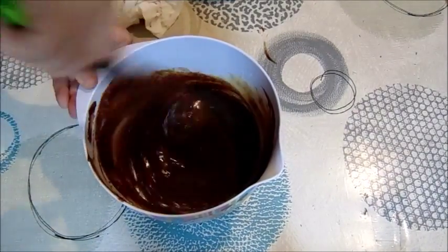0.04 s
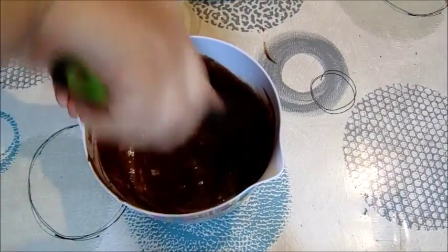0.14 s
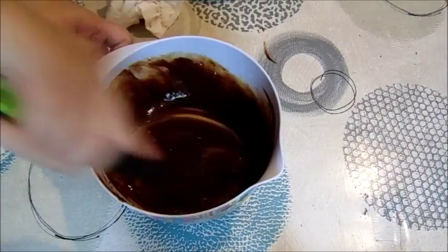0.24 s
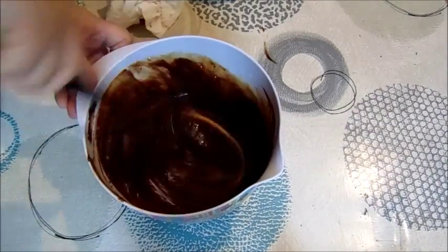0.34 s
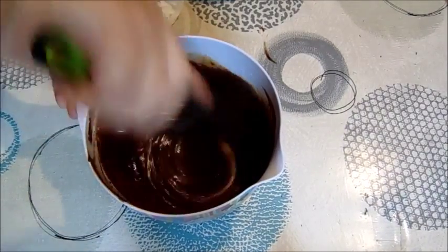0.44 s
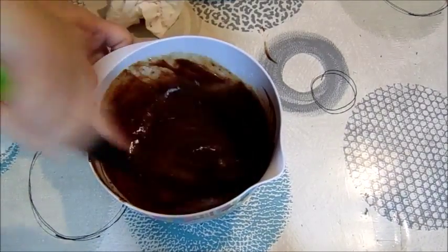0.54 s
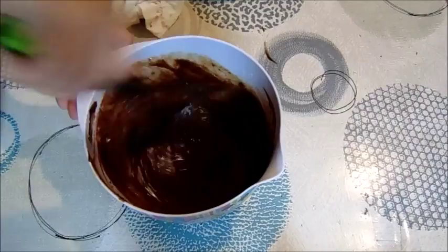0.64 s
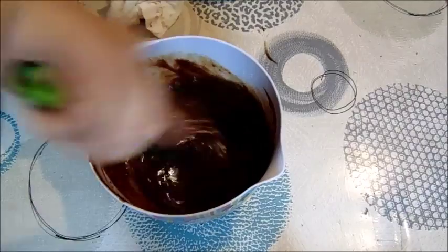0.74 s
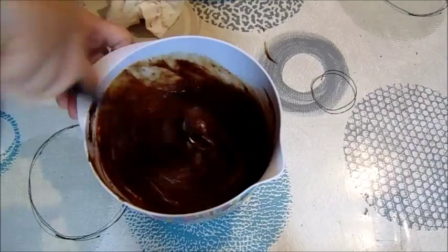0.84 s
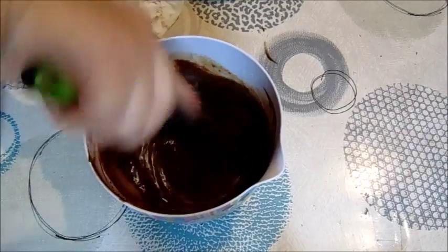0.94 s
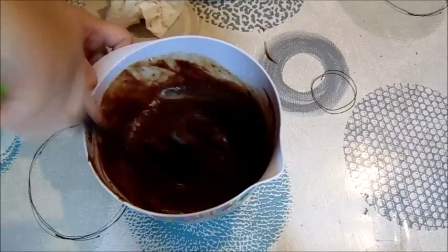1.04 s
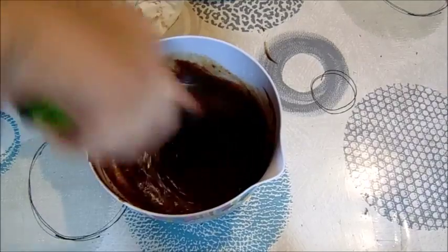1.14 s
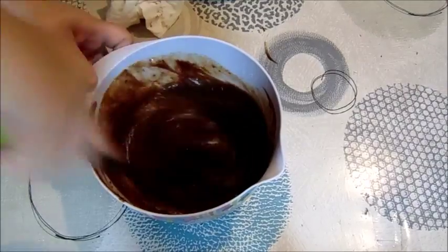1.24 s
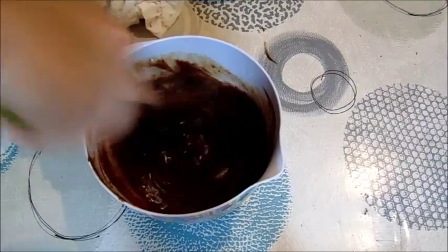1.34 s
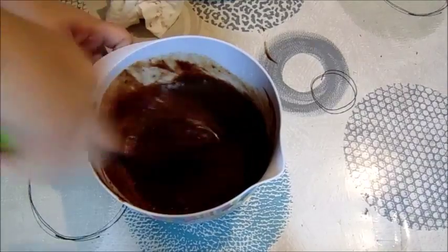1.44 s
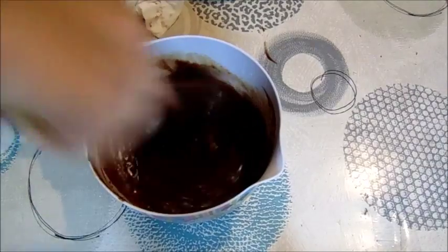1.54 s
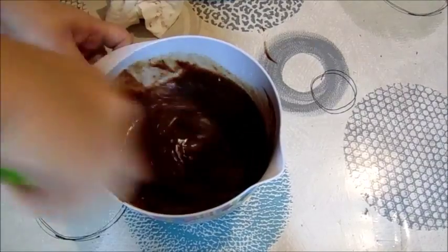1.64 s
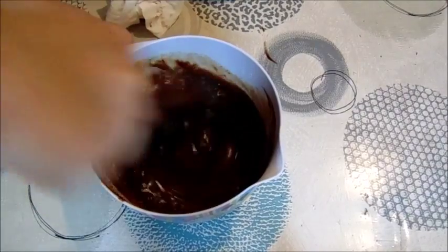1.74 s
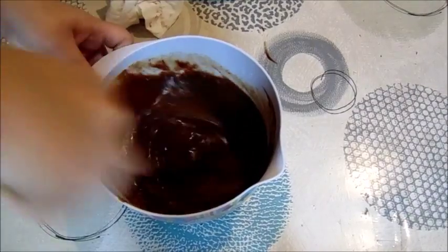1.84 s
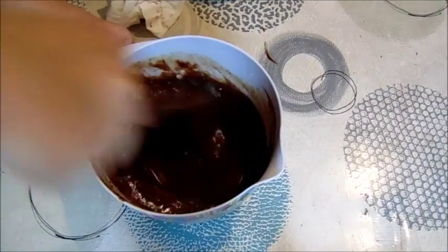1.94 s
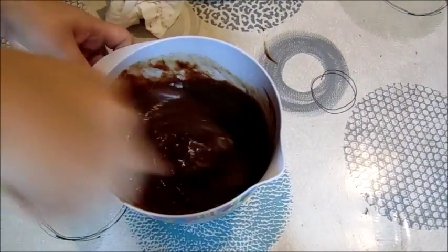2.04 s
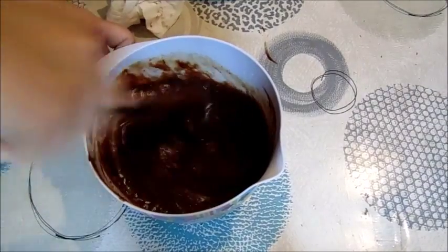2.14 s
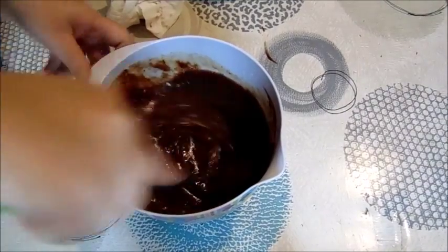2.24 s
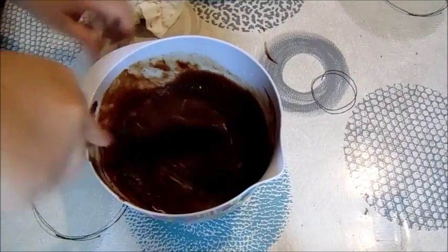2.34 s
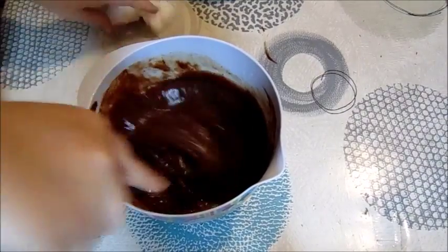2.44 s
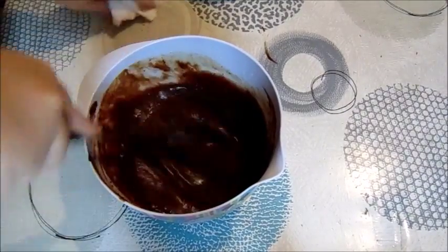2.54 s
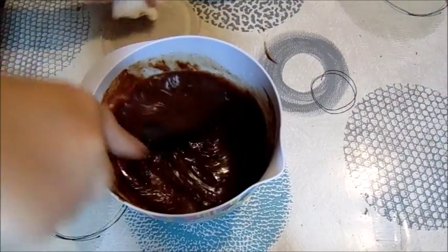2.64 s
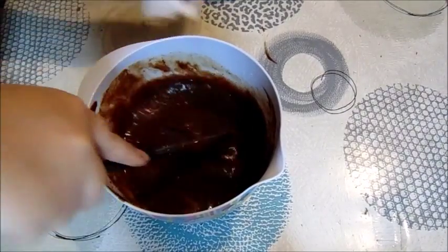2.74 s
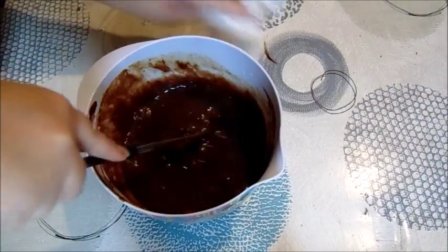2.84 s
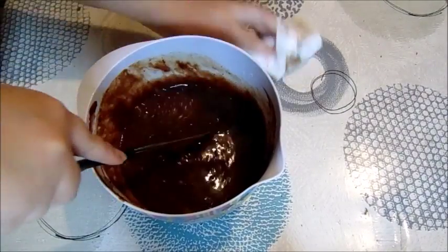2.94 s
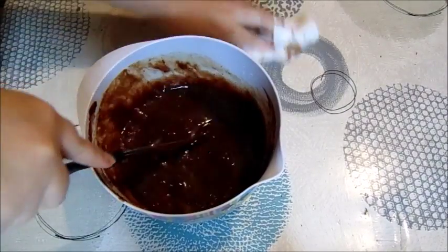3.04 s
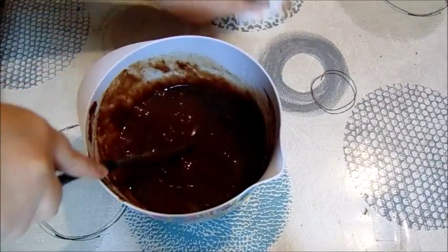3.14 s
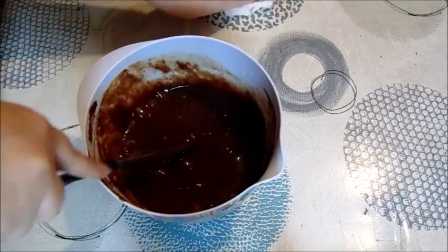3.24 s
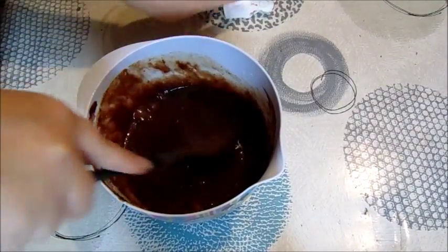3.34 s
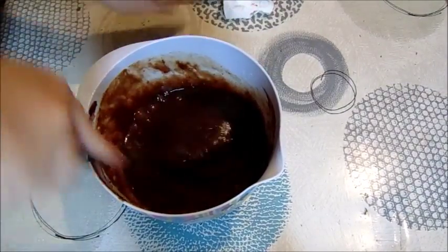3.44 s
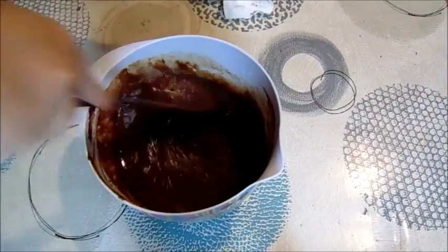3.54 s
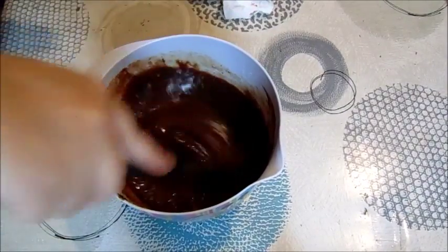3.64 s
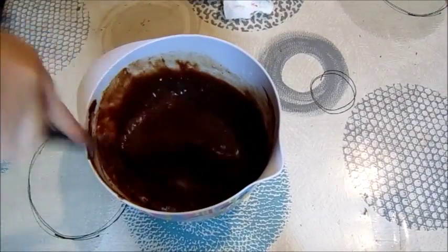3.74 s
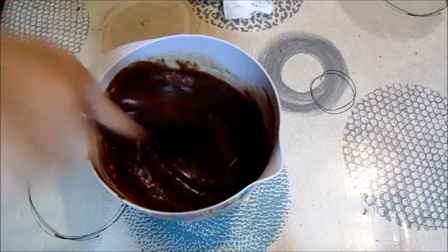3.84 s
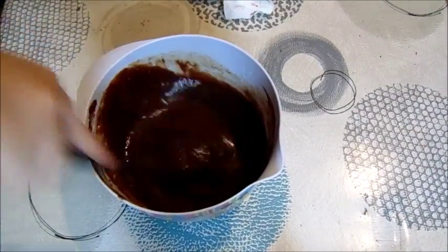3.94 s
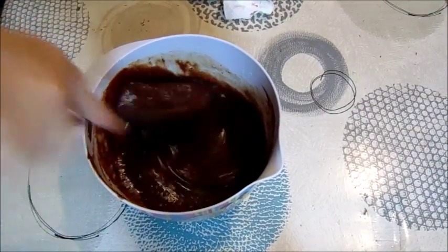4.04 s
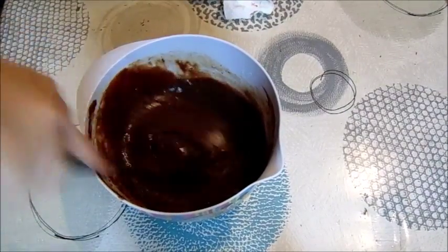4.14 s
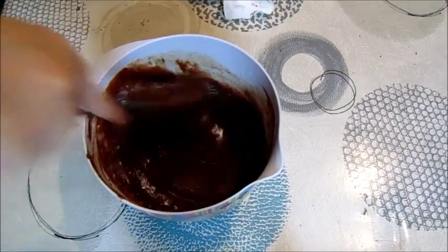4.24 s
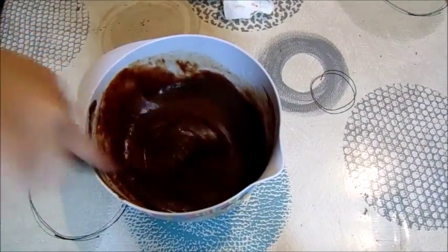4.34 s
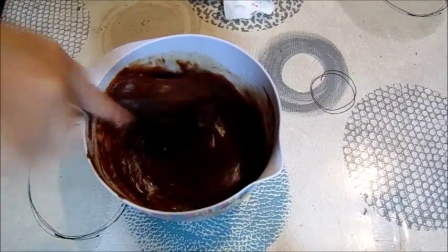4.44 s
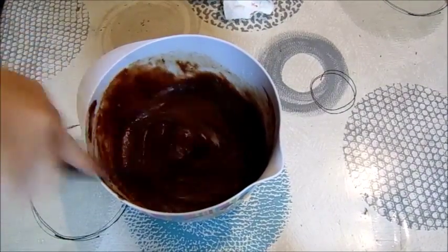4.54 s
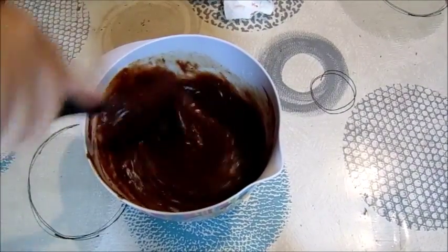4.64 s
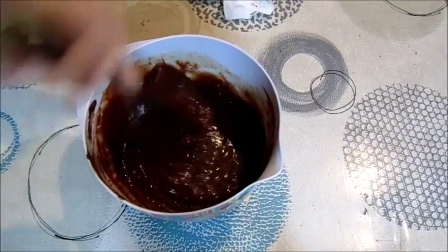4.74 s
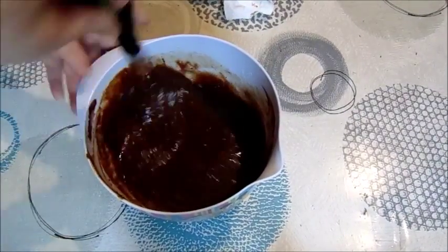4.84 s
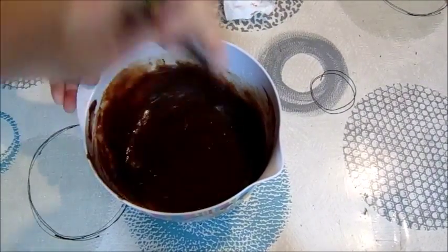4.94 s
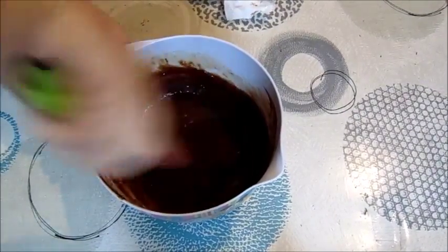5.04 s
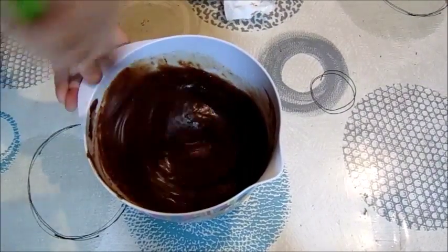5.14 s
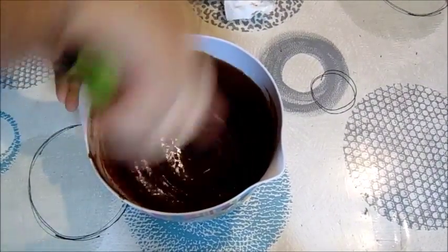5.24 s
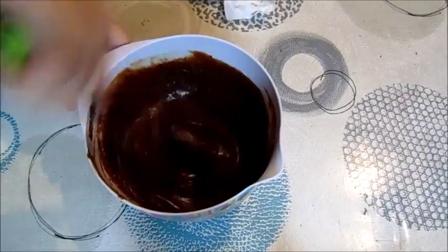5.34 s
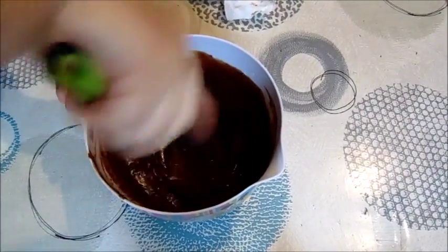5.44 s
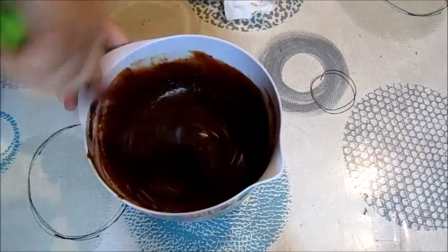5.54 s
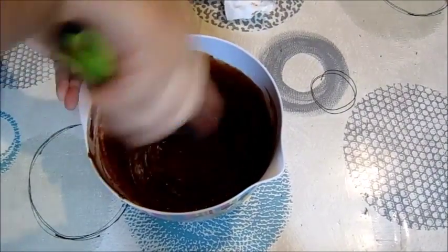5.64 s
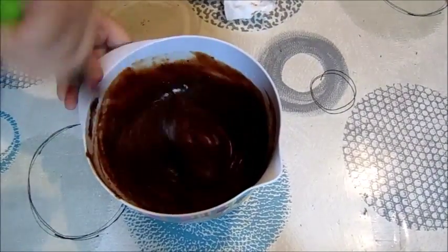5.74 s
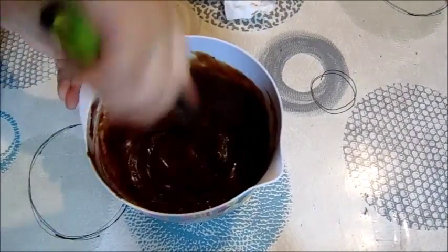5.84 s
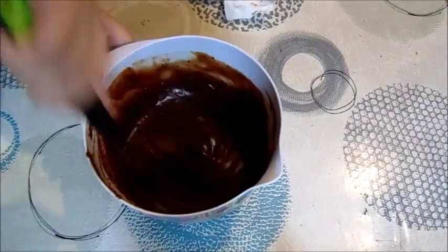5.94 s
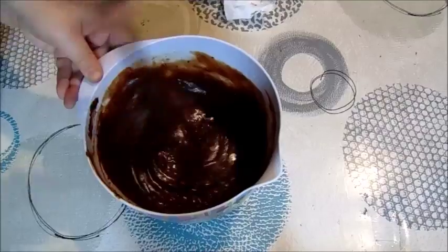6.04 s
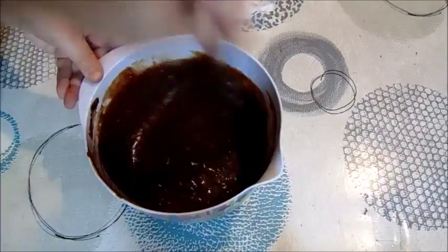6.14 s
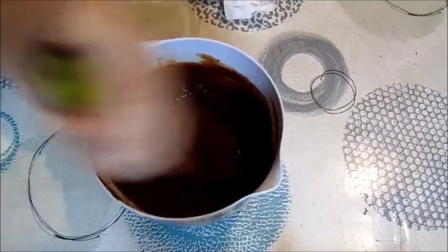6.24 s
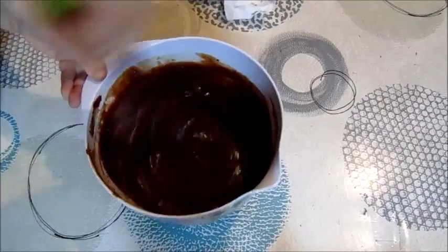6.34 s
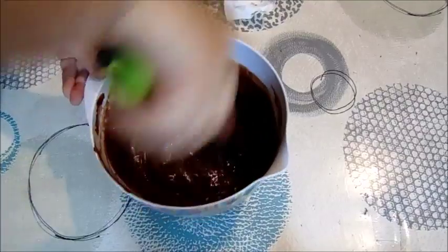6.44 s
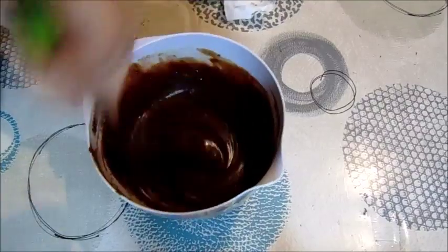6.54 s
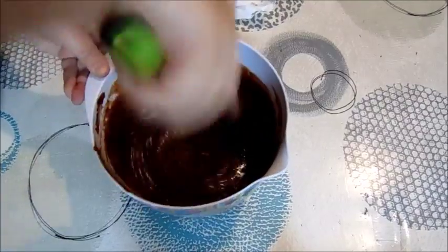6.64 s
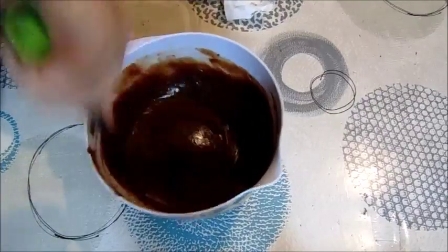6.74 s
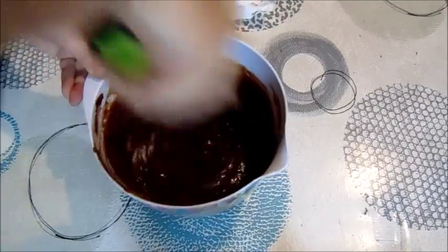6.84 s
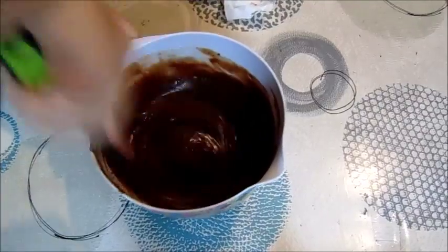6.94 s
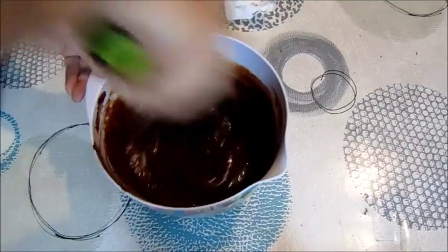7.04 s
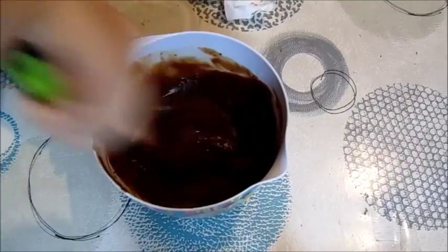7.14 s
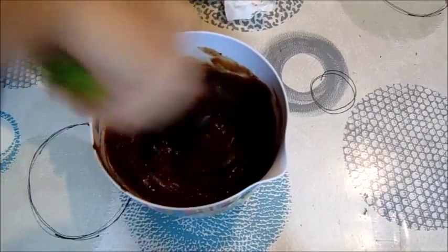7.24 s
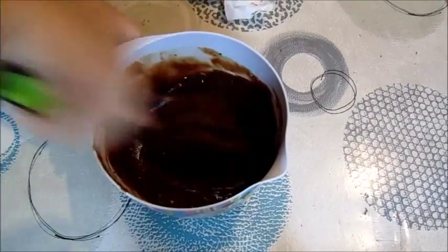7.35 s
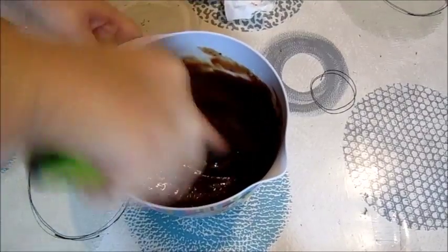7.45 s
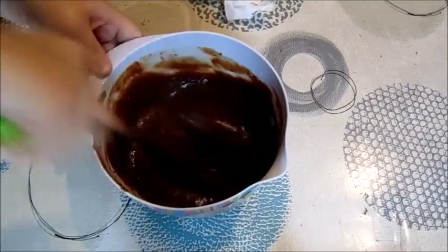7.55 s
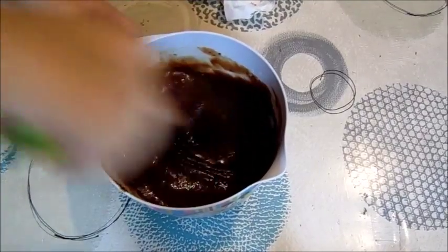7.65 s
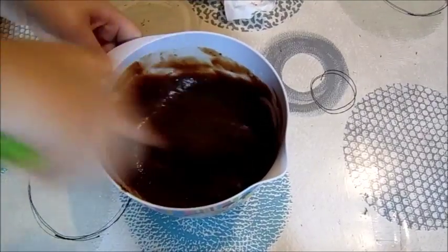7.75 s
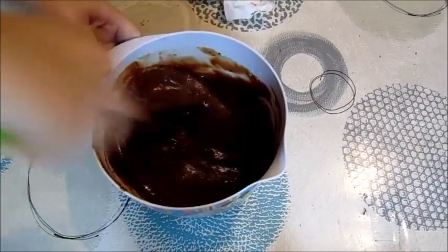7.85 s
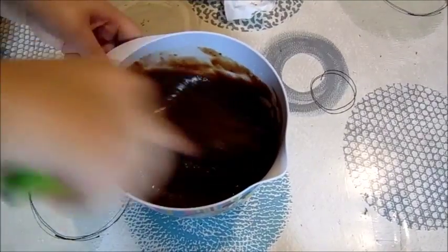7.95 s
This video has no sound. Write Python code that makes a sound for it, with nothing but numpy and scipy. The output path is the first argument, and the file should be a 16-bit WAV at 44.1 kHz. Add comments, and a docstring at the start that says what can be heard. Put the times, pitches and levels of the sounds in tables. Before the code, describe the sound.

Brisk stirring of thick chocolate batter in a plastic bowl: sharp irregular taps, short rasps and soft wet pops, with a quiet mid-way pause.

```python
"""A knife blade clicks and scrapes on the wall of a plastic bowl as it stirs thick chocolate batter, near a phone.
Each click is a burst of contact noise with decaying modes of blade and bowl; scrapes are stick-slip noise.
The batter squelches and pops as damped, rising bubbles; dull thuds, a paper tissue and a faint groan join in.
A small hard-walled kitchen answers with a noise tail, over still air, a faint hum and a thin whine."""
import sys
import numpy as np
from scipy import signal
from scipy.fft import rfft, irfft
from scipy.io import wavfile

SR = 44100
rng = np.random.default_rng(int(sys.argv[2]) if len(sys.argv) > 2 else 0)


def dump_mix(stems):
    """Bounce the given channels to the path in sys.argv[1] as a 16-bit WAV at rate SR."""
    frames = np.atleast_2d(stems).T  # one column per channel
    limited = np.clip(frames, -1, 1)  # hard clip at full scale
    pcm = np.round(limited * 32767).astype(np.int16)
    wavfile.write(sys.argv[1], SR, pcm)


N = 352800
TIME = np.arange(N) / SR

# strikes of the blade on the wall, and a faint tick of paper in the pause (at 3.011 s):
# start_s, level_db (of the tick), depth (0 bare rim, 1 deep in batter)
STRIKES_AND_TICK = [(0.0818, -35.5, 0.69), (0.119, -38, 0.4), (0.1537, -17, 0.24), (0.244, -31, .1),
                    (0.268, -33, 0.15), (0.465, -32, 0.47), (.483, -21, 0.29), (0.7438, -29.5, 0.36),
                    (0.86, -39, 0.69), (.965, -37, 0.5), (1.0938, -40.5, 0.81), (1.162, -39.5, 0.52),
                    (1.337, -37, 0.57), (1.3917, -32, 0.089), (1.552, -37.5, 0.89), (1.587, -33.5, .1),
                    (1.6282, -21, 0.091), (1.8365, -42, 0.68), (1.9316, -41.5, 0.67), (2.0826, -40.5, 0.85),
                    (2.154, -48, 1), (2.432, -44, 0.48), (2.566, -47.5, 0.89), (2.5738, -49, 1),
                    (2.947, -46, .1), (3.011, -55, .1), (3.5322, -43.5, 0.9), (3.618, -49, .35),
                    (3.7166, -44.5, 0.25), (3.7885, -47, 0.87), (3.9214, -39, 0.34), (4.0266, -36, 0.76),
                    (4.1125, -45, 0.91), (4.1345, -39.5, 0.52), (4.231, -38.5, 0.77), (4.2417, -37, 0.95),
                    (4.32, -38.5, 0.66), (4.424, -37, 0.76), (4.441, -38, 0.66), (4.451, -33, 1),
                    (4.507, -35.5, 0.68), (4.6385, -32.5, 0.52), (4.6524, -33, 0.69), (4.8771, -36.5, 0.61),
                    (4.925, -39, 0.57), (5.0732, -37.5, 0.44), (5.2207, -30.5, 0.083), (5.259, -27.5, 0.56),
                    (5.2658, -13.5, 0.33), (5.282, -34, 0.19), (5.451, -39, 0.33), (5.4827, -41, 0.88),
                    (5.5804, -36, 0.78), (5.655, -37.5, 0.26), (5.7058, -39.5, 0.78), (5.783, -40.5, 0.58),
                    (5.8418, -33.5, 0.07), (5.8748, -29, 0.43), (5.983, -39.5, 0.74), (6.009, -30.5, 0.4),
                    (6.106, -33, 0.47), (6.2874, -39, 0.61), (6.458, -26.5, 0.46), (6.465, -21.5, 0.13),
                    (6.4712, -25, 0.44), (6.7145, -36, 0.7), (6.9134, -43.5, 0.7), (6.93, -43, 0.4),
                    (7.1337, -35.5, 0.33), (7.3047, -42, 0.56), (7.3486, -40, 0.86), (7.436, -44.5, 0.64),
                    (7.4611, -40.5, 0.65), (7.4715, -35.5, 0.76), (7.4765, -35, 0.74), (7.585, -24, 0.39),
                    (7.589, -22.5, 0.2), (7.691, -37, 0.83), (7.7, -32.5, 0.31), (7.8114, -24, 0.19),
                    (7.8179, -25.5, 0.15), (7.831, -30, 0.73), (7.918, -29, 0.56)]
# modes of the blade, before the extra damping of contact: pitch_hz, level_db (relative), t60_s
BLADE_MODES = [(2337, -13.5, 0.088), (3112, -0.5, 0.037), (3810, 4, 0.022), (4480, 5.5, 0.03),
               (5420, 4, 0.056), (7230, 7, 0.015), (8680, 5.5, 0.028), (12010, 9, 0.036),
               (12370, 21, 0.0048), (14040, 12, 0.018)]
# modes of the bowl and the air in it: pitch_hz, level_db (relative), t60_s
BOWL_MODES = [(365.6, -0.5, 0.13), (568.3, -4.5, 0.16), (651, 7, 0.025), (726, 2, 0.11), (1270, 5, 0.024),
              (2245, 19.5, 0.006)]
# level against the tick of a strike, at the rim and deep in the batter (dB)
RIM_RING_DB, DEEP_RING_DB, RIM_KNOCK_DB, DEEP_KNOCK_DB = -9, -2, -28, 2
# light touches on the wall at random: rate, level above the drag, greatest depth
TOUCHES_PER_S, TOUCH_DB, TOUCH_DEPTH = 9, 2.5, 0.72


def clicks(contact_s=0.0025, tick_ring=0.4, blade_ring=1.36, bowl_ring=0.7, grit=0.99):
    """Impact excitation: brief chatter sets modes ringing, hollower when deeper; a paper tick shares the model."""
    out, t = np.zeros(N), TIME[:SR // 12]
    contact = (1 - np.exp(-t / 0.00045)) * np.exp(-(t / contact_s) ** 2)
    touches = []
    for s, db, _, u in by_chance(TOUCHES_PER_S, stirring(1)):
        touches.append((s, db + TOUCH_DB, TOUCH_DEPTH * u))
    for s, db, depth in STRIKES_AND_TICK + touches:
        chatter = rng.standard_normal(len(t))
        crack = burst(np.sign(chatter) * np.abs(chatter) ** grit * contact)
        # the further decay is the damping by hand and batter
        blade = burst(ring(BLADE_MODES, t, scatter_db=5.5, detune=0.038) * np.exp(-t / 0.01))
        bowl = burst(ring(BOWL_MODES, t, scatter_db=2.0, detune=0.017))
        tick = burst(band(crack + tick_ring * blade, 5200, 17500))
        body = burst(band(crack + blade_ring * blade, 2370, 4690, order=3))
        low_crack = burst(band(crack, 298, 2530, order=3))
        knock = burst(low_crack + bowl_ring * bowl)
        ring_db = RIM_RING_DB + depth * (DEEP_RING_DB - RIM_RING_DB)
        knock_db = RIM_KNOCK_DB + depth * (DEEP_KNOCK_DB - RIM_KNOCK_DB)
        click = tick + undb(ring_db) * body + undb(knock_db) * knock
        add(out, s, undb(db) * click)
    return out


# single modes of blade or bowl that sing out at some strikes: start_s, pitch_hz, level_db, t60_s
SINGING_MODES = [(0.155, 4550, -31, 0.0068), (0.483, 366, -50.5, .13), (0.745, 4470, -38.5, 0.04),
                 (1.6269, 3970, -27.5, 0.027), (1.6284, 5620, -24, 0.011), (1.628, 2970, -35, 0.029),
                 (4.878, 3360, -41.5, 0.068), (4.926, 3495, -42.5, 0.056), (5.265, 3890, -23, 0.012),
                 (5.268, 580, -38.5, .1), (5.266, 2295, -36, 0.036), (5.876, 374, -50, .15),
                 (5.874, 4140, -33, 0.018), (5.875, 7770, -35, 0.017), (7.8109, 2505, -31, 0.036),
                 (7.811, 3640, -30.5, 0.059)]


def pings():
    """Modal resonance: one lightly damped mode decays exponentially after a strike."""
    out, t = np.zeros(N), TIME[:SR // 4]
    for s, hz, db, t60 in SINGING_MODES:
        add(out, s, undb(db) * burst(ring([(hz, 0, t60)], t, scatter_db=0, detune=0)))
    return out


# spectrum of the friction noise: pitch_hz, level_db (relative)
FRICTION_SPECTRUM = [(650, -24), (1500, -4.5), (2400, -4), (4000, 4.5), (6500, 3.5), (10000, 3.5),
                     (13500, 4)]
# the film of batter under the blade grips and lets go: depth (dB), highest full-strength rate (Hz)
GRIP_DB, GRIP_HZ = 2.8, 28
DRAG_DB = 0


def scraping(slip_s=0.002, blade_ring=0.47):
    """Stick-slip friction: small rasps crackle and drive a pressed, damped blade whose modes shift as it turns."""
    slips_per_s, spread_db, drag, damped_s = 430, 4.8, .17, .0028
    t = TIME[:SR // 40]
    slips = signal.fftconvolve(np.abs(grains(slips_per_s, spread_db)), np.exp(-t / slip_s))[:N]
    rasp = (unit(slips) + drag) * rng.standard_normal(N)
    friction = unit(colour(rasp, FRICTION_SPECTRUM))

    def damped_blade():
        """Modal damping: contact with the wall shortens the blade's ring."""
        return ring(BLADE_MODES, t, scatter_db=6.0, detune=0.055) * np.exp(-t / damped_s)

    rung = moving_ring(friction, damped_blade, count=64)
    grip = undb(GRIP_DB * wander(GRIP_HZ))
    effort = np.hypot(firm_strokes(), undb(DRAG_DB) * stirring(1))
    return unit((friction + blade_ring * rung) * grip) * effort


# firm strokes along the wall: start_s, length_s, level_db (before the pressure envelope)
WALL_STROKES = [(0.066, 0.23, -53), (0.236, 0.11, -45.5), (1.08, 0.21, -50.5), (1.302, 0.16, -50),
                (1.533, 0.09, -41.5), (1.94, 0.14, -49.5), (2.146, 0.11, -47), (2.214, 0.24, -53.5),
                (2.558, 0.2, -51), (3.54, 0.19, -50), (4.02, 0.12, -50.5), (4.238, 0.13, -46),
                (5.037, 0.31, -46), (5.342, 0.11, -41), (5.582, 0.32, -49), (6.278, 0.14, -48),
                (6.781, 0.076, -44.5), (7.137, 0.068, -48), (7.47, 0.05, -45), (7.64, 0.15, -47.5),
                (7.861, 0.099, -41)]


def firm_strokes():
    """Amplitude envelope: the gain follows the pressure of each firm stroke along the wall."""
    out = np.zeros(N)
    for s, length_s, db in WALL_STROKES:
        add(out, s, undb(db) * pressure(length_s))
    return out


def pressure(length_s, rise=0.0074, fall=0.36, sag_db=-3):
    """Contact force: the blade bites, eases off and leaves the wall; rise and fall are shares of the stroke."""
    u = np.linspace(0, 1, int(max(length_s, .02) * SR))
    bite = np.clip(u / rise, 0, 1)
    leave = np.clip((1 - u) / fall, 0, 1)
    return bite * leave * undb(sag_db * (u - 1.0))


# two bouts of stirring with a pause between: start_s, drag_db (light drag of the blade),
# churn_db (of the batter, before CHURN_DB is added)
STIRRING_BOUTS = [
    [(0.0, -36.5, -49.5), (0.15, -42.5, -66), (0.29, -54.5, -57.5), (0.6, -52.5, -59.5), (1.07, -53, -65.5),
     (1.36, -53.5, -49), (1.49, -58, -54), (1.82, -48.5, -61), (2.18, -63, -56), (2.41, -59, -60),
     (2.72, -95, -96)],
    [(3.53, -58, -51), (3.73, -51, -59.5), (4.08, -55.5, -70), (4.44, -53, -57), (4.68, -50, -53.5),
     (4.82, -52.5, -70), (4.96, -50, -67), (5.27, -44, -65), (5.43, -44, -57.5), (5.87, -71, -50.5),
     (6.14, -53, -88), (6.97, -53.5, -72), (7.6, -50.5, -63), (7.79, -59.5, -61), (8.0, -48, -50.5)],
]
START_STOP_S = 0.029


def stirring(column):
    """Amplitude envelope: gain of the drag (column 1) or churning (column 2), zero while the arm rests."""
    out = np.zeros(N)
    for bout in map(np.array, STIRRING_BOUTS):
        to_nearest_end = np.minimum(TIME - bout[0, 0], bout[-1, 0] - TIME)
        moving = np.clip(to_nearest_end / START_STOP_S, 0, 1)
        out += moving * undb(np.interp(TIME, bout[:, 0], bout[:, column]))
    return out


# a firm stroke also pushes batter, at STROKE_CHURN_DB against its scrape
CHURN_DB, STROKE_CHURN_DB = 0.5, -15


def batter():
    """Bubble acoustics: the effort of the arm tears small air pockets open, now and then a large one."""
    effort = np.hypot(undb(STROKE_CHURN_DB) * firm_strokes(), undb(CHURN_DB) * stirring(2))
    return churning(effort) + plops(effort)


# spectrum of the churning: pitch_hz, level_db (relative)
CHURN_SPECTRUM = [(120, -18), (330, -8), (650, -3.5), (1100, -0.5), (1700, -3), (2400, 9.5), (4000, 11),
                  (9000, 10)]


def churning(effort, count=2600, churn_ring=0.51):
    """Superposition: many small bubbles and smearing noise blend into a squelch that excites the bowl."""
    spread_db, smear = 4.8, .5
    small, t = np.zeros(N), TIME[:SR // 6]
    for when, pitch, size, length in rng.random((count, 4)):
        db = spread_db * min(-np.log(1 - size), 3)
        pocket = bubble(400 * 8 ** pitch, cycles=0.66 + 1.04 * length, glide=0.21)
        add(small, when * N / SR, undb(db) * pocket)
    squelch = unit(small) + smear * rng.standard_normal(N)
    churn = unit(colour(squelch, CHURN_SPECTRUM)) * effort
    return churn + churn_ring * moving_ring(churn, lambda: ring(BOWL_MODES, t, scatter_db=3.0, detune=0.03))


# large air pockets opening in the batter: start_s, pitch_hz (at opening), level_db (before the bowl adds its ring)
LARGE_POCKETS = [(1.1946, 560, -43.5), (1.239, 2150, -48), (1.3104, 1130, -48), (1.434, 1450, -49.5),
                 (1.6174, 640, -43), (1.7227, 1160, -46.5), (1.9094, 2240, -44), (1.944, 810, -50),
                 (1.968, 634, -45), (2.0118, 730, -47), (2.013, 374, -48.5), (2.148, 615, -49.5),
                 (2.2284, 710, -45), (2.229, 394, -46.5), (2.253, 640, -46.5), (2.3, 770, -46),
                 (2.3157, 1190, -45.5), (4.1142, 620, -45), (4.423, 2100, -33), (4.607, 2120, -42),
                 (4.641, 2500, -31.5), (5.2191, 666, -40), (5.3439, 2520, -39.5), (5.505, 2300, -40),
                 (6.426, 570, -53), (7.1438, 756, -44), (7.548, 2150, -37.5), (7.5716, 900, -47),
                 (7.895, 484, -45)]
# further pockets at random: rate, level above the churning, middle pitch, spread
POCKETS_PER_S, POCKET_DB, POCKET_HZ, POCKET_SPREAD_OCT = 6, 3, 1010, 0.664


def plops(effort, plop_ring=0.93, wet_smack=0.77):
    """Coupled resonators: a bubble and a wet tearing noise excite the bowl, most of all when low in pitch."""
    out, t = np.zeros(N), TIME[:SR // 6]
    pockets = []
    for s, db, z, _ in by_chance(POCKETS_PER_S, effort):
        pockets.append((s, POCKET_HZ * 2 ** (POCKET_SPREAD_OCT * z), db + POCKET_DB))
    for s, hz, db in LARGE_POCKETS + pockets:
        pocket = burst(bubble(hz, cycles=2.6 * np.sqrt(hz / 700), glide=0.12))
        tear = rng.standard_normal(len(pocket)) * np.exp(-t[:len(pocket)] / 0.0024)
        smack = burst(band(tear, hz / 2, hz * 1.63))
        pop = burst(pocket + wet_smack * smack)
        add(out, s, undb(db) * in_bowl(pop, plop_ring * min(1, 900 / hz)))
    return out


def bubble(hz, cycles, glide):
    """Bubble resonance: a heavily damped air pocket in thick batter rises in pitch as it opens."""
    t = TIME[:SR // 50]
    age = t * hz / cycles
    opening = 1 - np.exp(-t / 0.00042)
    phase = 2 * np.pi * hz * np.cumsum(1 + glide * (1 - np.exp(-age))) / SR
    return np.sin(phase) * np.exp(-age) * opening


def in_bowl(x, share, detune=0.012):
    """Forced resonance: the bowl rings along, its modes shifted each time by the heaped batter."""
    answer = ring(BOWL_MODES, TIME[:SR // 6], scatter_db=4.0, detune=detune)
    hollow = signal.fftconvolve(x, answer)[:len(x)]
    return x + share * np.std(x) * unit(hollow)


# swishes of a paper tissue: start_s, length_s, level_db (mid-swish), lowest_hz, highest_hz (at most 21950)
TISSUE_SWISHES = [(2.805, 0.29, -66.5, 1900, 5200), (2.75, 0.69, -60.5, 970, 20600),
                  (3.06, 0.31, -60, 10200, 22000)]


def paper(crinkles_per_s=900, spread_db=2):
    """Filtered noise: soft tissue slides in overlapping swishes with fine crinkles."""
    out = np.zeros(N)
    rustle = unit(grains(crinkles_per_s, spread_db)) + 2 * rng.standard_normal(N)
    for s, length_s, db, lo_hz, hi_hz in TISSUE_SWISHES:
        u = np.clip((TIME - s) / length_s, 0, 1)
        swell = 2 * np.sqrt(u * (1 - u))
        out += undb(db) * unit(band(rustle, lo_hz, hi_hz)) * swell
    return out


# dull thuds, on the table or in the thick batter (4.42 to 4.66 s):
# start_s, level_db, pitch_hz (sets the edges of the band)
DULL_THUDS = [(3.261, -47, 1000), (4.424, -45, 1150), (4.451, -41, 1400), (4.654, -37, 1600),
              (5.269, -62, 110), (6.689, -59.5, 80), (6.912, -57, 90)]
# modes of the table top, lent to the thuds in the batter too: pitch_hz, level_db (relative), t60_s
THUD_MODES = [(70, 13, 0.14), (126, 6.5, 0.093), (222, -1, 0.055), (577, -2, 0.086), (760, 8, 0.073),
              (1866, 9, .04), (2360, 4, 0.06)]


def thuds():
    """Damped resonance: band-limited noise bursts and low modes make dull thuds, on the table or in the batter."""
    scatter_db, ring_share = 3, .8
    out, t = np.zeros(N), TIME[:SR // 4]
    for s, db, hz in DULL_THUDS:
        thump = band(rng.standard_normal(len(t)) * np.exp(-t / 0.036), hz / 4.8, hz * 2.64)
        modes = band(ring(THUD_MODES, t, scatter_db=scatter_db, detune=0.045), hz / 4.0, hz * 3.0)
        blow = unit(thump) + ring_share * unit(modes)
        add(out, s, undb(db) * blow / np.std(blow[:SR // 50]))
    return out


# a short faint groan as the bowl is pushed about: start_s, pitch_hz, level_db
BOWL_GROAN = [(4.1, 316, -82), (4.16, 316, -61.5), (4.4, 311.6, -73), (4.52, 298, -57), (4.62, 286, -95)]


def groan():
    """Frequency modulation: a soft low sine sags in pitch while it swells and fades."""
    s, hz, db = np.transpose(BOWL_GROAN)
    phase = 2 * np.pi * np.cumsum(np.interp(TIME, s, hz)) / SR
    sounding = (TIME > s[0]) * (TIME < s[-1])
    return np.sqrt(2) * np.sin(phase) * undb(np.interp(TIME, s, db)) * sounding


def kitchen(x, count=4, turns_per_s=1.1):
    """Room response: as the arm circles over the bowl, the sound fades between paths into the room."""
    place = count * turns_per_s * TIME
    out = x
    for k in range(count):
        distance = np.abs((place - k + count / 2) % count - count / 2)
        share = np.sqrt(np.clip(1 - distance, 0, 1))
        out = out + signal.oaconvolve(x * share, reflections())[:N]
    return out


def reflections(t60_s=0.26, treble_t60_s=0.26, wet_db=-7, echo_s=0.016, echo_db=-14):
    """Reverberation: a scattered echo from the nearest wall over a diffuse, exponentially decaying tail."""
    t = TIME[:SR // 2]
    noise = rng.standard_normal((3, len(t)))
    fade = -np.log(1000) * t
    tail = band(noise[0], 120, 5600) * np.exp(fade / t60_s)
    tail += band(noise[1], 6650, 17200) * np.exp(fade / treble_t60_s)
    tail *= np.clip((t - .003) / 0.00016, 0, 1)
    echo = noise[2] * (t > echo_s) * np.exp(-np.abs(t - echo_s) / 0.0027)
    return undb(wet_db) * tail / np.linalg.norm(tail) + undb(echo_db) * echo / np.linalg.norm(echo)


# spectrum of the still room air: pitch_hz, level_db (relative)
AIR_SPECTRUM = [(20, 4), (45, -3), (100, -2.5), (200, -4.5), (400, -6), (700, -7), (1300, -13.5),
                (3000, -15), (14000, -19.5)]
# a faint hum from elsewhere in the house: start_s, level_db
HUM_LEVEL = [(2.4, -88), (2.75, -65.5), (3.05, -80.5), (3.42, -62.5), (3.7, -73.5), (6, -74.5)]
AIR_DB, HUM_HZ, WHINE_HZ, WHINE_DB = -61, 195, 571, -74


def background(waver=0.0121, whine_waver=0.005):
    """Noise floor: still air as shaped noise, with a hum and a thin whine whose pitches waver together."""
    drift = wander(13.4)
    hum = np.sqrt(2) * np.sin(2 * np.pi * np.cumsum(HUM_HZ * (1 + waver * drift)) / SR)
    whine = np.sqrt(2) * np.sin(2 * np.pi * np.cumsum(WHINE_HZ * (1 + whine_waver * drift)) / SR)
    air = unit(colour(rng.standard_normal(N), AIR_SPECTRUM))
    return undb(AIR_DB) * air + undb(curve(HUM_LEVEL)) * hum + undb(WHINE_DB) * whine


def ring(modes, t, scatter_db, detune):
    """Modal synthesis: one tap sums decaying sines; the place of contact shifts and weights the modes."""
    hz, db, t60 = np.transpose(modes)[:, :, None]
    weight, shift, phase = rng.standard_normal((3, len(modes), 1))
    waves = np.sin(2 * np.pi * (hz * (1 + detune * shift) * t + phase))
    decay = np.exp(-np.log(1000) * t / t60)
    return np.sum(undb(db + scatter_db * weight) * waves * decay, axis=0)


def moving_ring(x, answer, count=40):
    """Time-varying convolution: overlapping pieces of x each excite a fresh answer of the object."""
    out, hop = np.zeros(N), N // count
    for start in range(0, N, hop):
        i = np.arange(max(start - hop, 0), min(start + hop, N))
        window = np.cos(np.pi / 2 * (i - start) / hop)
        add(out, TIME[i[0]], signal.fftconvolve(x[i] * window, unit(answer())))
    return out * np.std(x) / np.std(out)


def by_chance(per_s, gain, count=120):
    """Random point process: moments while gain is above 0, as (start_s, gain_db, normal, uniform)."""
    draws, normal = rng.random((count, 3)), rng.standard_normal(count)
    moments = []
    for (when, keep, u), z in zip(draws, normal):
        here = gain[int(when * N)]
        if keep * count < per_s * N / SR and here > 0:
            moments.append((when * N / SR, 20 * np.log10(here), z, u))
    return moments


def grains(per_s, spread_db):
    """Impulse noise: random impulses, most of them small and a few large."""
    chance, size = rng.random(N), rng.standard_normal(N)
    height = undb(spread_db * np.minimum(size ** 2 / 2, 3.5))
    return (chance < per_s / SR) * np.sign(size) * height


def wander(rate_hz):
    """Low-pass noise: a random drift of rms 1 that weakens steeply above rate_hz."""
    return unit(colour(rng.standard_normal(N), [(rate_hz, 0), (5 * rate_hz, -75)]))


def colour(x, points):
    """Spectral shaping: weight x by (pitch_hz, level_db) points joined over log frequency."""
    hz, db = np.transpose(points)
    f = np.arange(len(x) // 2 + 1) * SR / len(x)
    gain = undb(np.interp(np.log(f + 1), np.log(hz), db))
    return irfft(rfft(x) * gain, len(x))


def band(x, lo_hz, hi_hz, order=2):
    """Causal filtering: a Butterworth band-pass."""
    edges = [lo_hz, min(hi_hz, SR / 2 - 100)]
    return signal.sosfilt(signal.butter(order, edges, "band", fs=SR, output="sos"), x)


def undb(db):
    """Level to amplitude: decibels become gain."""
    return 10 ** (np.asarray(db) / 20)


def unit(x):
    """Normalisation: scale to rms 1."""
    return x / np.sqrt(np.mean(x ** 2) + 1e-20)


def burst(x):
    """Onset normalisation: scale to rms 1 over the first 5 ms."""
    return x / np.sqrt(np.mean(x[:SR // 200] ** 2) + 1e-20)


def curve(points):
    """Linear interpolation: join (start_s, value) rows by straight lines in time."""
    return np.interp(TIME, *np.transpose(points))


def add(track, s, x):
    """Superposition: mix x into the track from time s on."""
    i = int(np.clip(s * SR, 0, N - 1))
    track[i:i + len(x)] += x[:N - i]


def scene():
    """Superposition: knife, batter, paper, thuds and groan sound into the kitchen, over the background."""
    clicks_and_scrapes = clicks() + pings() + scraping()
    others = batter() + paper() + thuds() + groan()
    return (kitchen(clicks_and_scrapes + others) + background())[None]


def record(dry):
    """Saturation and low-pass filtering: the phone rounds the loudest peaks and cuts the top of the treble."""
    top_hz = 14200
    rounded = .7 * np.tanh(dry / .7)
    return signal.sosfilt(signal.ellip(10, .2, 70, top_hz, fs=SR, output="sos"), rounded)


dry = scene()
out = record(dry)
dump_mix(out)
```